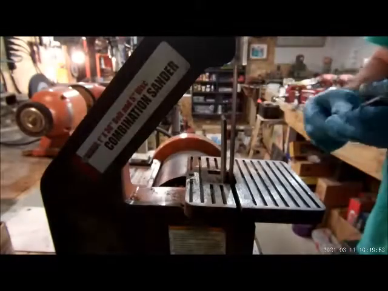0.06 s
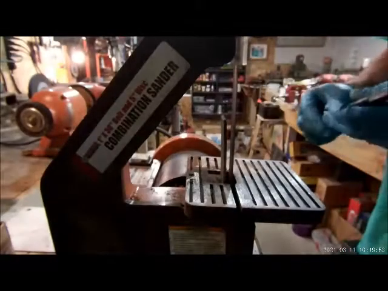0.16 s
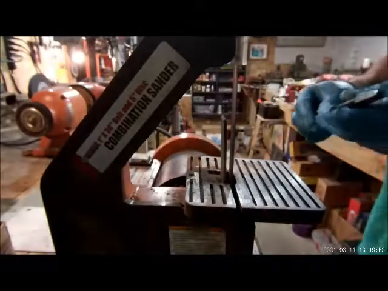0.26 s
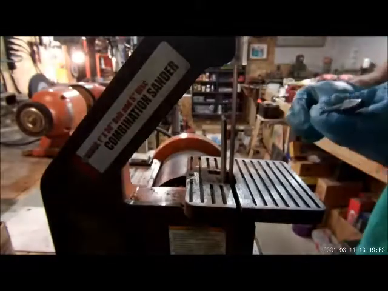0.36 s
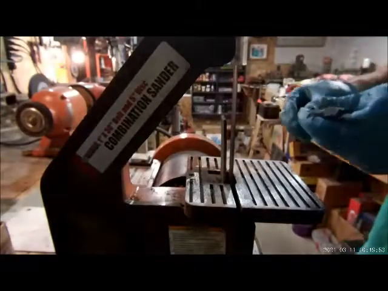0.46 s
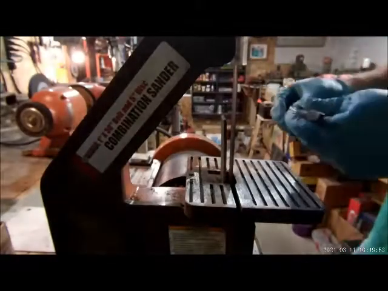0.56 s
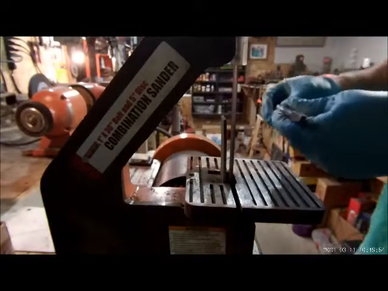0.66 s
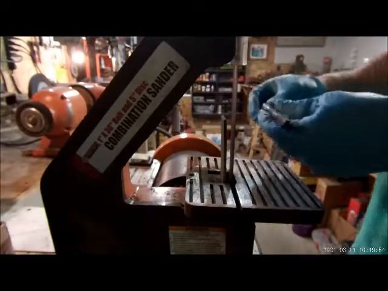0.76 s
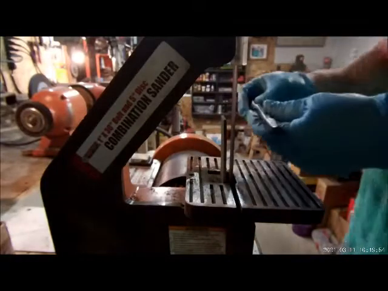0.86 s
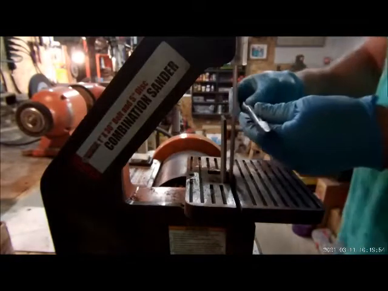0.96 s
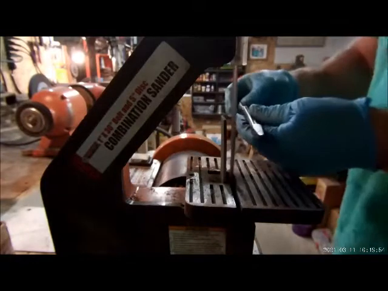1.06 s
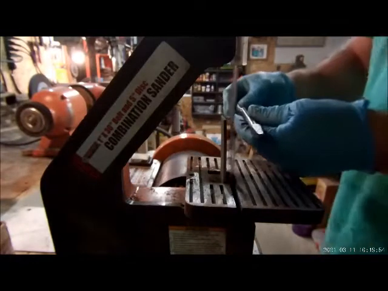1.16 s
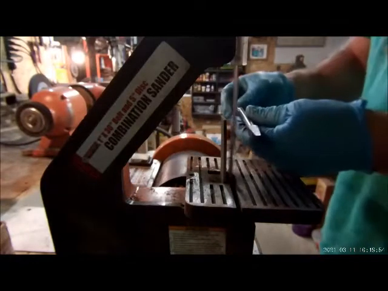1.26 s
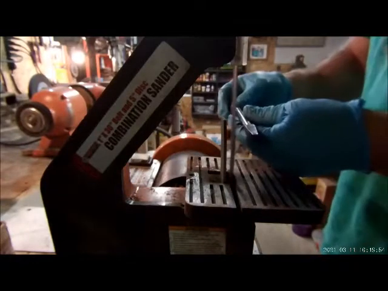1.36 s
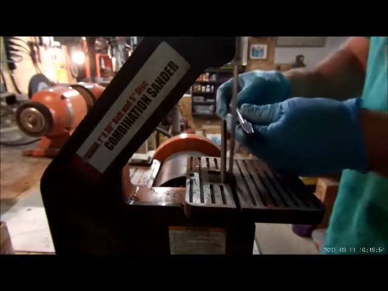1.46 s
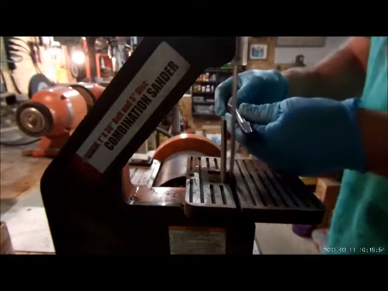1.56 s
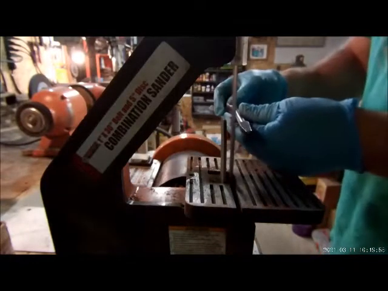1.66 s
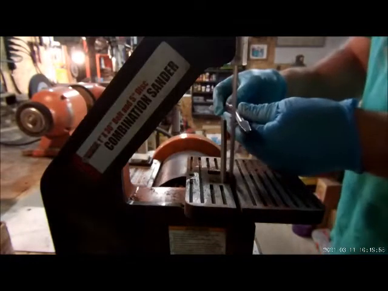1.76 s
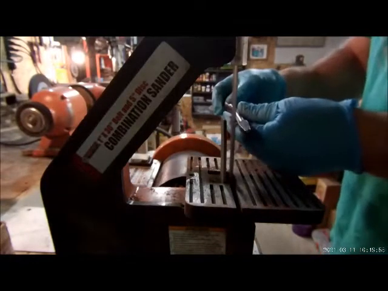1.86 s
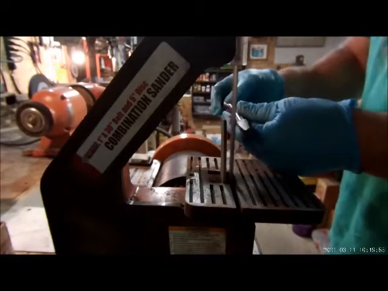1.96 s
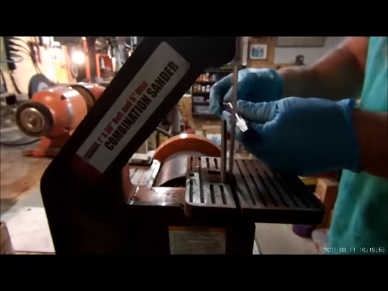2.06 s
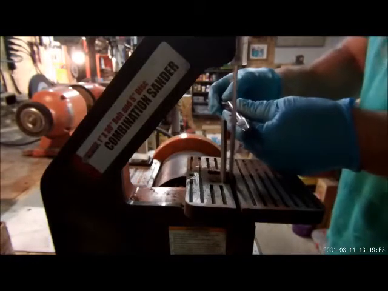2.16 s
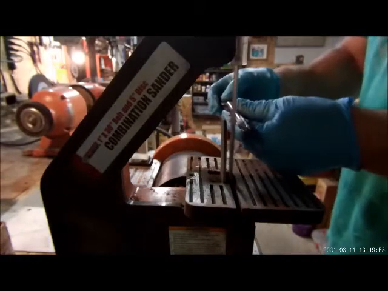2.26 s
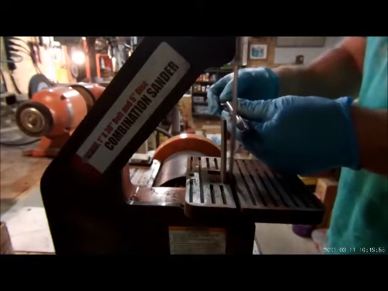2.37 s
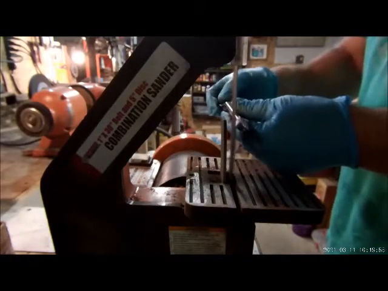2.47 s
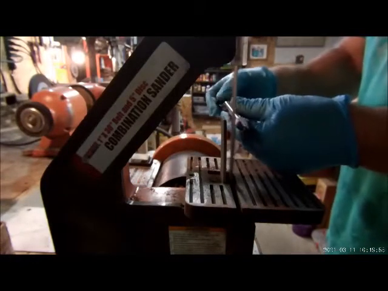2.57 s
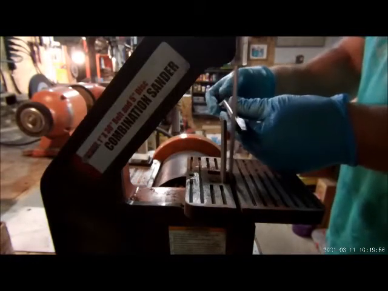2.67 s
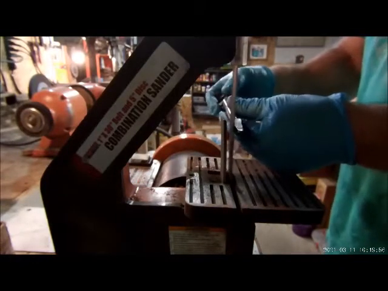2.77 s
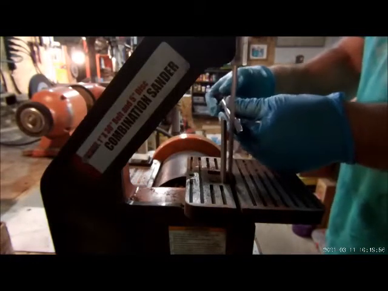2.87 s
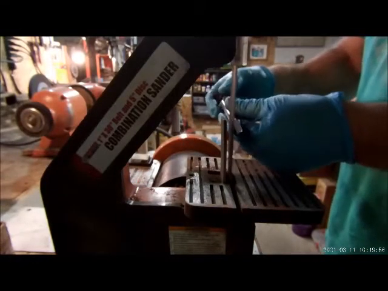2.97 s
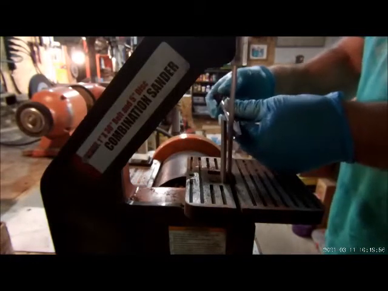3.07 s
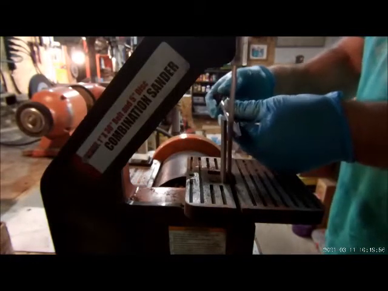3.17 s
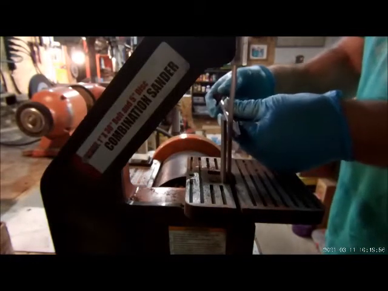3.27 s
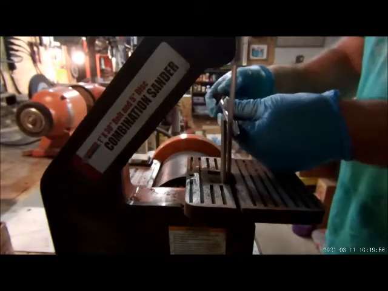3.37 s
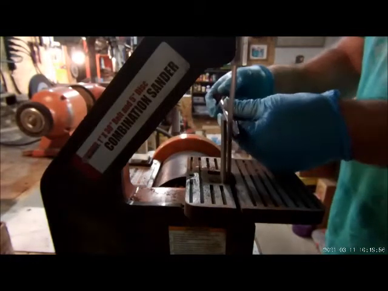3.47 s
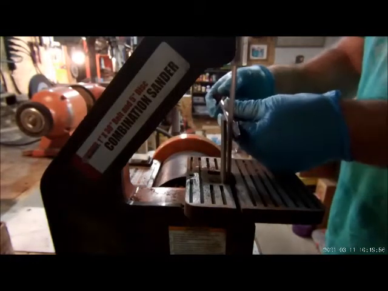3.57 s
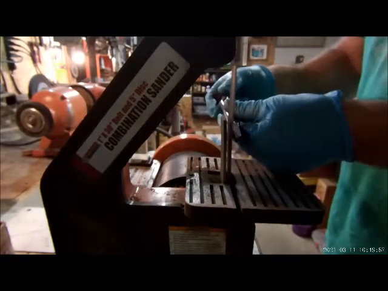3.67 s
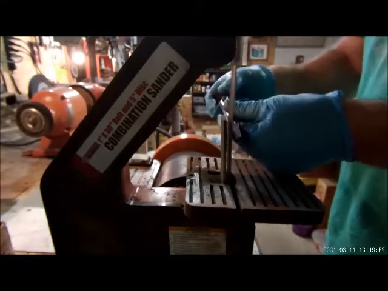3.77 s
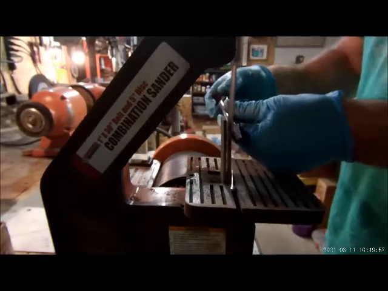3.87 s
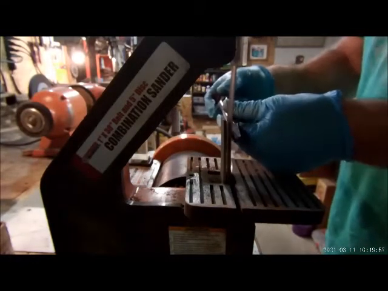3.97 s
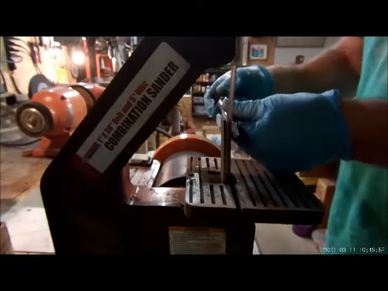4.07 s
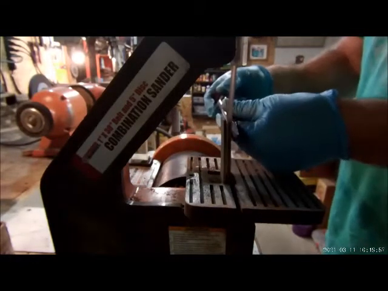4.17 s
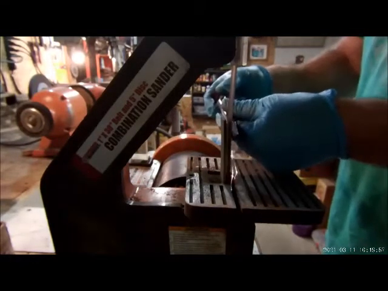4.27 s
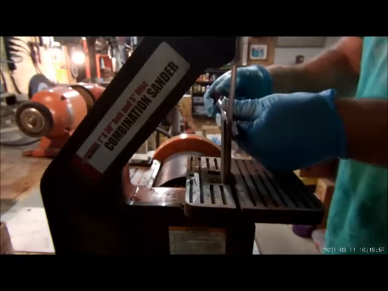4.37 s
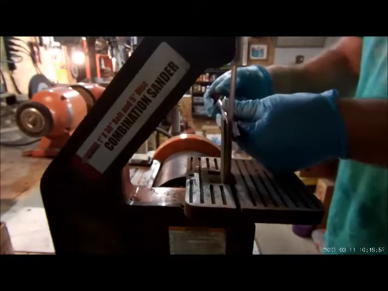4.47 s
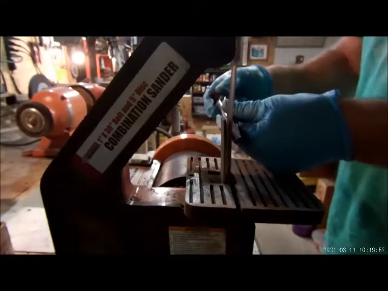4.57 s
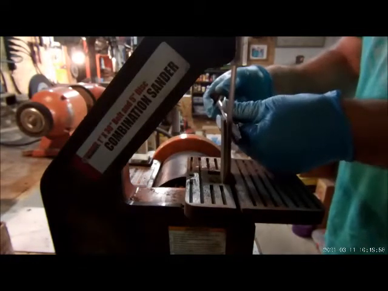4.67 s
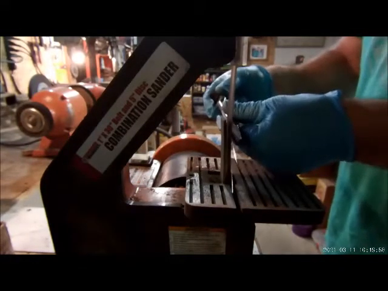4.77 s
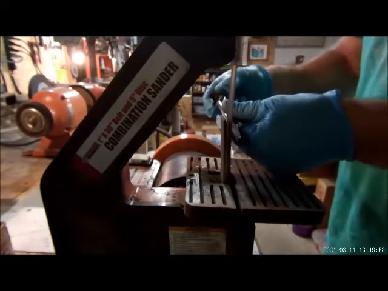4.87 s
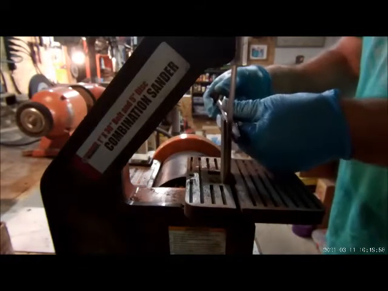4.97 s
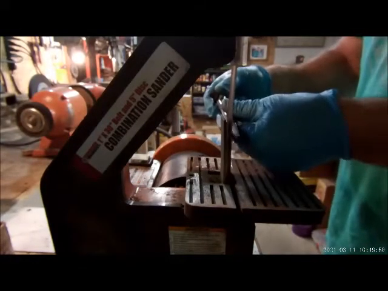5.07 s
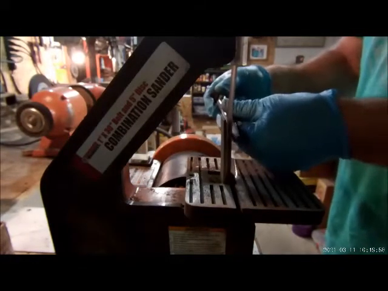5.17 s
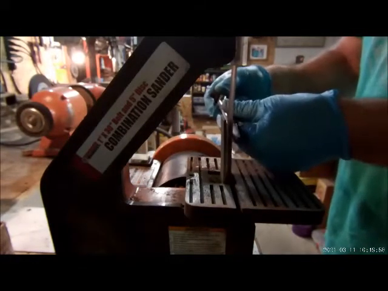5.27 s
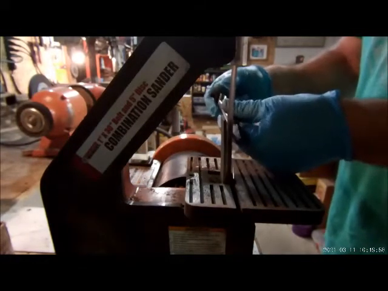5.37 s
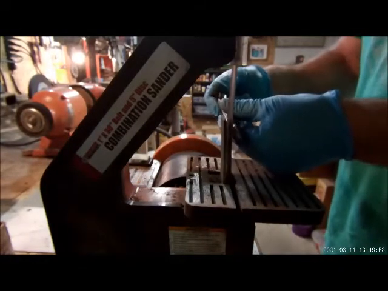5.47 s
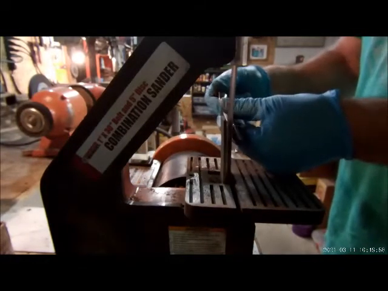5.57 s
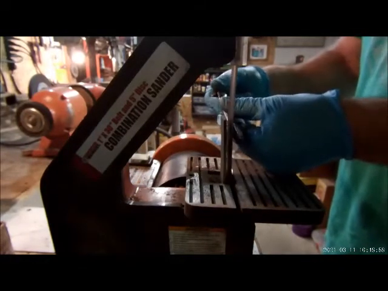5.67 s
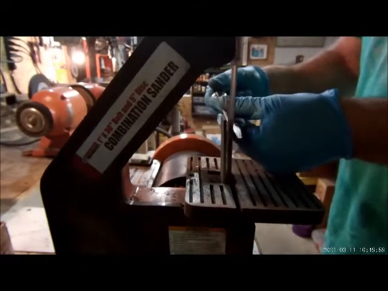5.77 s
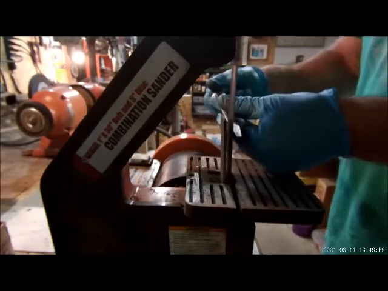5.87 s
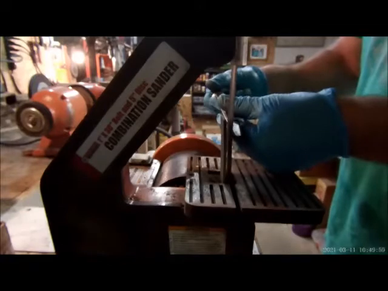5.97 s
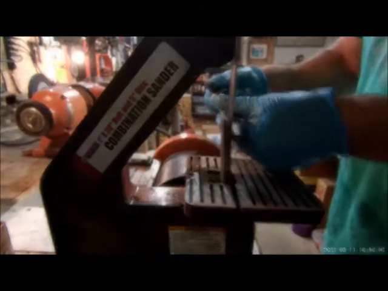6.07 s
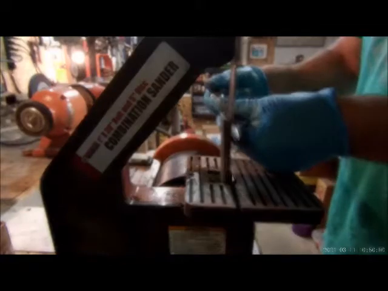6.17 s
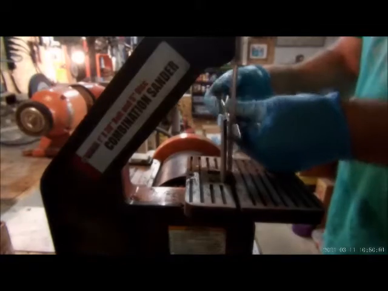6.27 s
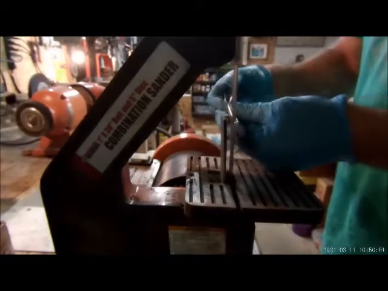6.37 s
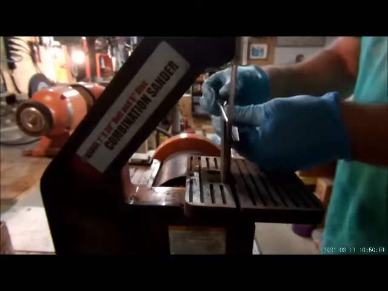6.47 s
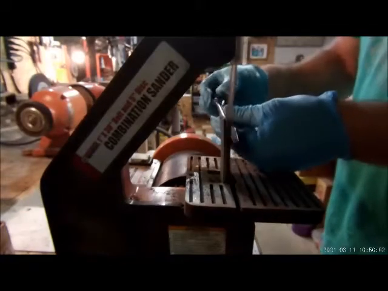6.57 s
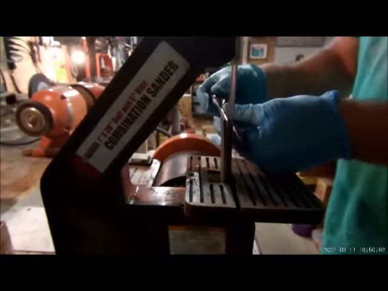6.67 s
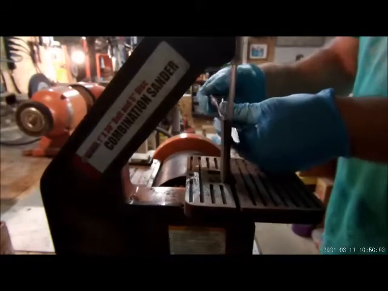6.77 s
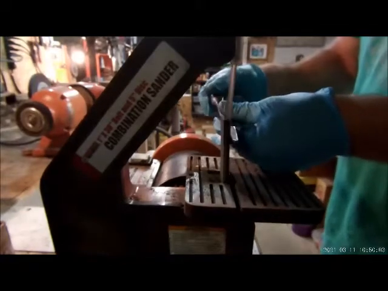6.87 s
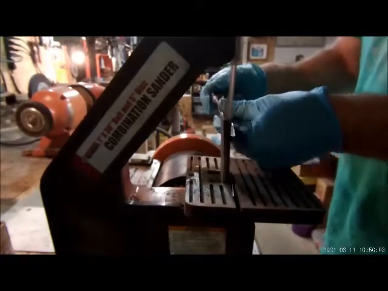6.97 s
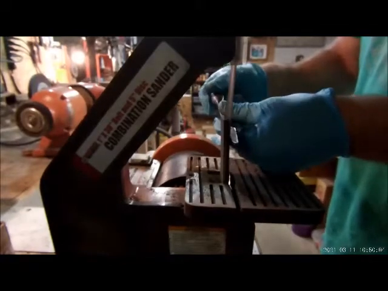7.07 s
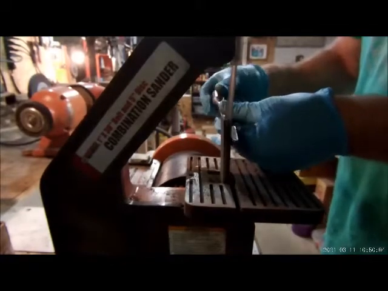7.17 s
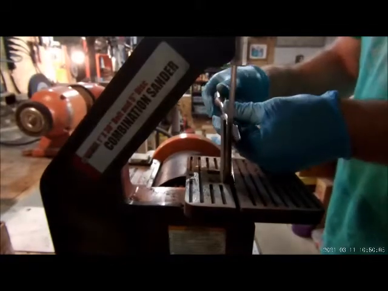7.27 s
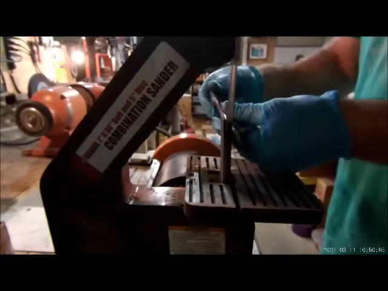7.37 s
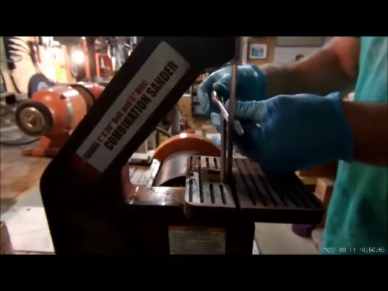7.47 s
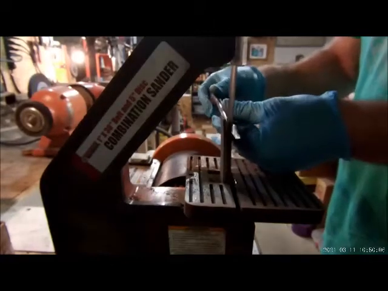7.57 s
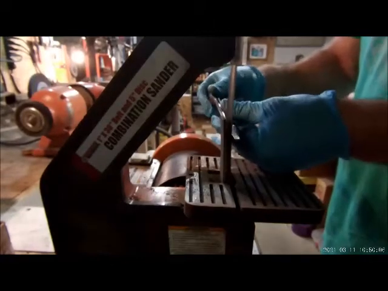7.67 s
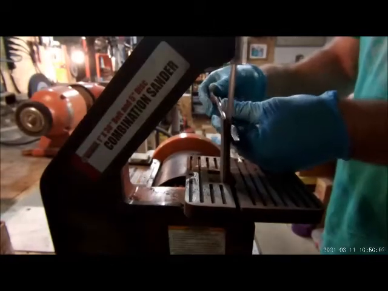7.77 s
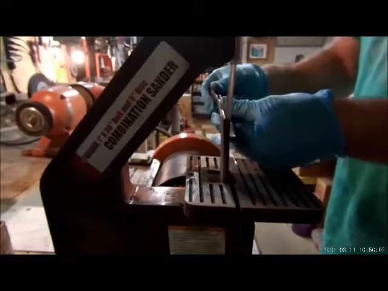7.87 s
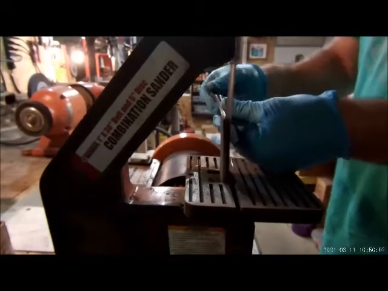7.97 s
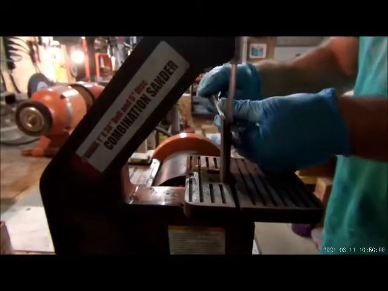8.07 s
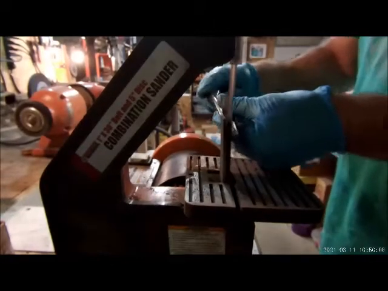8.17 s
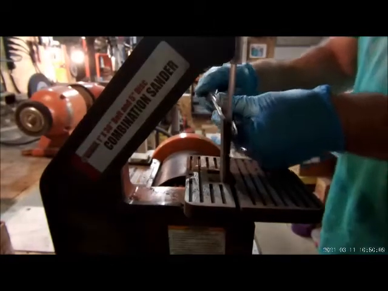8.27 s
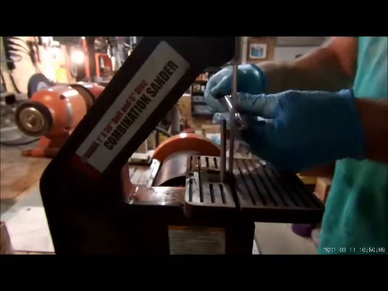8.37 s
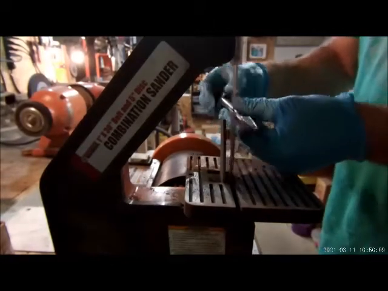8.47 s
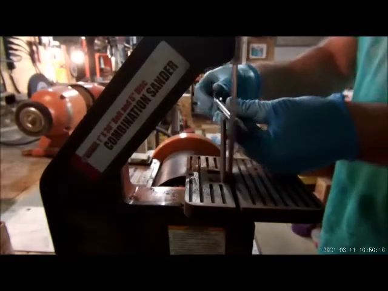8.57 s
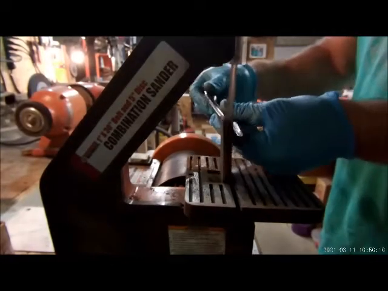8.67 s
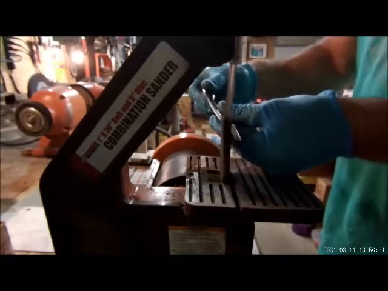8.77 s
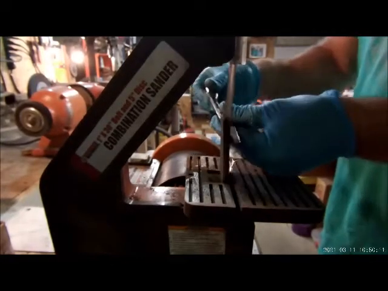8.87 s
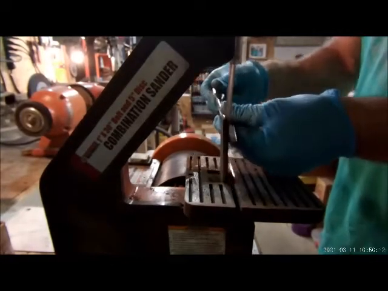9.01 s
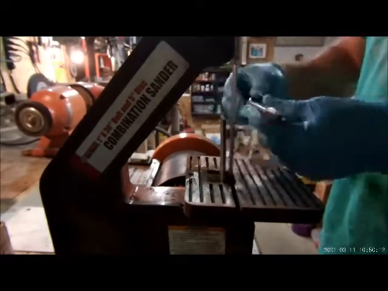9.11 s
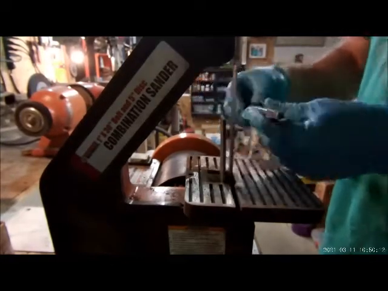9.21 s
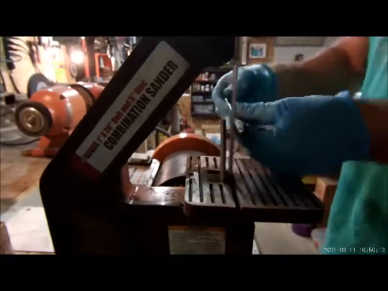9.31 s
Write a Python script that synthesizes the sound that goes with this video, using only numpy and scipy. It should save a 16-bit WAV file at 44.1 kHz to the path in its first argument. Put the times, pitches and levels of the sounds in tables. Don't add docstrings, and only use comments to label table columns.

```python
import sys
import numpy as np
from scipy import signal
from scipy.fft import rfft, irfft, next_fast_len
from scipy.io import wavfile
from scipy.ndimage import uniform_filter1d

SR = 44100
rng = np.random.default_rng(int(sys.argv[2]) if len(sys.argv) > 2 else 0)


def field_ratio(decibels):
    return 10 ** (np.asarray(decibels, dtype=float) / 20)


def wav_out(sig):
    wavfile.write(sys.argv[1], SR, np.round(np.clip(np.atleast_2d(sig).T, -1, 1) * 32767).astype(np.int16))


N = 411894
T = np.arange(N) / SR
FREE_HZ, MAINS_HZ = 59.04, 60


def noise():
    return rng.standard_normal(N)


def evened(x):
    return x / np.sqrt(np.mean(x ** 2) + 1e-20)


def drift(hz):
    knots = np.arange(0, N / SR + 1, .5 / hz)
    return evened(np.interp(T, knots, rng.standard_normal(len(knots))))


def impulses(events):
    out = np.zeros(N)
    for s, db in events:
        out[round(s * SR)] = field_ratio(db)
    return out


def colour(x, points, faster=1):
    hz, db = np.transpose(points)
    size, length = 16384, 4096
    bins_hz = abs(np.fft.fftfreq(size, 1 / SR))
    gain_db = np.interp(np.log(bins_hz + 1), np.log(hz * faster), np.maximum(db, -90))
    log_gain = gain_db * np.log(10) / 20
    phase = -signal.hilbert(log_gain).imag
    fade = np.hanning(2 * length)[length:]
    taps = np.fft.ifft(np.exp(log_gain + 1j * phase)).real[:length] * fade
    return signal.oaconvolve(x, taps / np.linalg.norm(taps))[:N]


def resonate(x, hz, width):
    r = np.exp(-np.pi * width / SR)
    pole = r * np.exp(2j * np.pi * min(hz, .49 * SR) / SR)
    return 2 * signal.lfilter([1 - r], [1, -pole], x).real


def low_cut(x, hz):
    return signal.sosfilt(signal.butter(3, hz, "high", fs=SR, output="sos"), x)


# (frequency [Hz], level [dB])
FRAME_TREBLE = [(2300, -26), (3500, -29.5), (4200, -44), (8000, -38), (16000, -79)]


def frame(blows, orders, faster=1):
    return colour(blows, [(59 * k, db) for k, db in orders] + FRAME_TREBLE, faster)


def plate_start(blows):
    plate_hz, width_hz = 1667, 8.3
    strikes = field_ratio(-18) * blows + impulses([(0, -45)])
    ring = resonate(strikes, plate_hz, width_hz) / (2 - 2 * np.exp(-np.pi * width_hz / SR))
    since = T - START_KNOCKS[0][0]
    whine = np.sqrt(2) * np.sin(2 * np.pi * plate_hz * T + 0.5 * drift(25.4))
    whine_db = -40 - 24 * since + 1.2 * drift(20)
    return ring + field_ratio(whine_db) * (since > 0) * whine


def gathering():
    creep_hz = 0.42
    s = np.transpose(START_KNOCKS)[0]
    midways = (s[1:] + s[:-1]) / 2
    hz = np.interp(T, np.r_[0, midways], np.r_[creep_hz, 1 / np.diff(s)])
    return np.clip(np.where(T > s[-1], FREE_HZ, hz) / FREE_HZ, 1e-3, 1)


# (time [s], peak level [dB])
START_KNOCKS = [(0.08, -19), (0.354, -10), (0.487, -6), (0.582, -6.5), (0.657, -6.5), (0.72, -5),
                (0.775, -6.5), (0.823, -6), (0.866, -7), (0.905, -11), (0.941, -8.5), (0.971, -22),
                (0.999, -6.5), (1.027, -12.5), (1.05, -7.5), (1.073, -9), (1.095, -8), (1.115, -7.5),
                (1.135, -8.5)]
# (frequency [Hz], density [dB per Hz])
KNOCK_SPECTRUM = [(120, -50), (200, -40), (596, -5.5), (798, -7.5), (974, 1), (1300, -19), (1680, -7),
                  (2960, -22.5), (3680, -26.5), (4500, -36), (4920, -66), (5490, -35.5), (8200, -33.5),
                  (9480, -31.5), (15500, -61)]
# (frequency [Hz], density [dB per Hz])
RATTLE_SPECTRUM = [(35, -117), (60, -62), (306, -32.5), (411, -23), (459, -13.5), (653, -7), (716, -12.5),
                   (894, -6.5), (1020, -15), (1100, -4), (1200, -21.5), (1270, -12.5), (1680, -7.5),
                   (2300, -14), (5000, -37.5), (6500, -41), (11000, -120)]
# (frequency [Hz], density [dB per Hz])
BELT_SPECTRUM = [(2350, -23), (4000, -1), (4510, -3.5), (4780, -3), (5260, -6), (6660, 4), (7990, 5),
                 (8560, 0.5), (9170, 7), (10700, -0.5), (13100, 0), (14100, -11), (14900, 2), (15700, -8)]
# (multiple of 59 Hz [1], level [dB])
FRAME_LOADED = [(1, -61), (2, -56), (3, -42), (4, -42.5), (5, -29.5), (6, -32), (7, -11), (8, -27.5),
                (9, -10.5), (10, -18), (11, -10), (12, -16), (13, -9), (14, -14.5), (15, 4.5), (16, 2),
                (17, -1.5), (18, 0.5), (19, -14), (20, -0.5), (21, -5.5), (22, -7), (23, -11.5), (24, -1.5),
                (25, -14.5), (26, -4), (27, 0.5), (28, -1.5), (29, -50), (30, -21.5), (31, -11.5),
                (32, -14), (33, -6), (34, -4), (35, -15), (36, -9.5)]


def spin_up():
    speed = gathering()
    decades = np.log10(speed)
    blows = impulses(START_KNOCKS)
    t = np.arange(700) / SR
    chatter = 0.65 * rng.standard_normal(len(t)) * np.exp(-t / 0.011)
    chatter *= rng.random(len(t)) < .03
    chatter[[0, 130, 370]] = .8, -.6, .9
    bounced = signal.oaconvolve(blows, chatter)[:N]
    knocks = field_ratio(1.5) * colour(bounced, KNOCK_SPECTRUM)
    knocks += field_ratio(10) * frame(bounced, FRAME_LOADED)
    decay = np.exp(-np.arange(4000) / SR / 0.027)
    tail = signal.oaconvolve(blows, decay)[:N] * noise()
    knocks += field_ratio(-15) * colour(tail, KNOCK_SPECTRUM)
    knocks += field_ratio(-16) * colour(blows, BELT_SPECTRUM)

    rattle_db = -23 + 18.5 * decades
    rattle = field_ratio(rattle_db) * evened(colour(noise(), RATTLE_SPECTRUM))
    handed_over = np.clip((1.16 - T) / 0.061, 0, 1)
    belt_db = -36 + 21 * decades - 6 * pressure() + drift(40)
    belt = field_ratio(belt_db) * evened(colour(noise(), BELT_SPECTRUM))
    belt *= np.clip(speed / .13, 0, 1) ** 2
    return knocks + handed_over * (rattle + plate_start(blows)) + belt


def spread(blows, faster):
    size = next_fast_len(N)
    hz = np.fft.rfftfreq(size, 1 / SR) / faster
    lag = 3.6 * np.sin(2 * np.pi * (hz - 950) / 1300)
    lag += .45 * np.sin(2 * np.pi * (hz - 945) / 330)
    return irfft(rfft(blows, size) * np.exp(-1j * lag), size)[:N]


# (multiple of 59 Hz [1], level [dB])
FRAME_FREE = [(1, -63), (2, -46.5), (3, -41), (4, -41.5), (5, -37.5), (6, -27), (7, -10), (8, -18.5),
              (9, -22.5), (10, -20.5), (11, -4.5), (12, -32.5), (13, -8), (14, -13.5), (15, 4.5), (16, -5),
              (17, 4), (18, -11), (19, -36), (20, -5.5), (21, -11), (22, -40), (23, -9), (24, -13.5),
              (25, -18.5), (26, -4), (27, -12), (28, 6.5), (29, -18), (30, -23), (31, 1), (32, -30),
              (33, -17), (34, -5.5), (35, -19.5), (36, -12)]


def machine(wheel_hz, load, faster, plate_db, throb_db, rattle_db):
    turns = np.cumsum(wheel_hz) / SR
    mains_hz = MAINS_HZ * faster
    slip = 4 * np.pi * (mains_hz * T - turns)
    alternation_db = field_ratio(rattle_db) * .8 * drift(3 * faster) * np.cos(np.pi * turns)
    strength = field_ratio(.5 * noise() + alternation_db)
    landed = np.diff(np.floor(turns), prepend=0) * strength
    landed *= field_ratio(throb_db * np.cos(slip + 2.8))
    late = np.clip(turns % 1 / (wheel_hz / SR + 1e-9), 0, 1)
    blows = spread(landed * (1 - late) + np.roll(landed * late, -1), faster)
    load = np.clip(load + 0.38 * np.cos(slip + 0.22), 0, 1)
    knocks = (1 - load) * evened(frame(blows, FRAME_FREE, faster))
    knocks += load * evened(frame(blows, FRAME_LOADED, faster))

    shaken = (5.7 + np.exp(-(turns % 1) / 5.3)) * field_ratio(0.52 * drift(12 * faster)) * noise()
    rattle = field_ratio(-7) * evened(colour(shaken, RATTLE_SPECTRUM, faster))
    rattle += field_ratio(-14) * evened(frame(shaken, FRAME_LOADED, faster))
    plate = evened(resonate(shaken, 1673 * faster, 14 * faster))
    plate *= 1 - load
    hum = np.cos(4 * np.pi * mains_hz * T) + 1.3 * np.cos(6 * np.pi * mains_hz * T)
    hum *= field_ratio(-55.5 + 2.7 * drift(4 * faster))
    return evened(knocks) + field_ratio(rattle_db) * rattle + field_ratio(plate_db) * plate + hum


# (frequency [Hz], width [Hz], level [dB])
GUARD_MODES = [(3420, 60, -48), (4400, 60, -52)]


def guard(wheel_hz):
    uneven_db = 1.5 * noise() + 2.5 * drift(3)
    pings = np.diff(np.floor(np.cumsum(wheel_hz) / SR / 2), prepend=0) * field_ratio(uneven_db)
    return sum(field_ratio(db) * evened(resonate(pings, hz, width)) for hz, width, db in GUARD_MODES)


def running():
    settle_s, sag_hz = .045, .55
    press = pressure()
    last_s = START_KNOCKS[-1][0]
    since = T - last_s
    short_hz = FREE_HZ - 1 / (last_s - START_KNOCKS[-2][0])
    wheel_hz = FREE_HZ - short_hz * np.exp(-abs(since) / settle_s) - sag_hz * press
    wheel_hz = wheel_hz * (1 + .001 * drift(4)) * (since > 0)
    load = 0.24 + (0.76 - 0.24) * press
    rattle_db = 1.96 - 0.68 * press
    sound = machine(wheel_hz, load, faster=0.99, plate_db=-10, throb_db=-0.24, rattle_db=rattle_db)
    level_db = -18 - 3 * press + 0.25 * drift(6.5)
    fade_in = np.clip((T - 1.13) / 0.02, 0, 1)
    return field_ratio(level_db) * fade_in * sound + field_ratio(-8 * press) * guard(wheel_hz)


def looped(x, keep):
    loop_hz, creep = 23.37, .004
    size = round(SR / loop_hz)
    loops = np.resize(x, (N // size + 1, size))
    worn = signal.lfilter([1], [1, -np.clip(keep, 0, .95)], loops, axis=0).ravel()
    place = np.cumsum(1 + creep * drift(2.5))
    return evened(worn[np.round(place).astype(int) % N])


def pressure():
    s, db = np.transpose(GRINDING)
    return field_ratio(np.interp(T, s, db) + 15) * (T > s[0])


# (time [s], grinding level [dB])
GRINDING = [(2.84, -29), (2.9, -22.5), (3.09, -18), (3.44, -16), (3.69, -17.5), (3.86, -15), (4.58, -16.5),
            (4.72, -14), (4.93, -16.5), (5.05, -15), (5.38, -16), (5.55, -14), (5.94, -20.5), (6.51, -18.5)]
# (time [s], peak level [dB])
FIRST_SKIPS = [(2.7681, -37), (2.7851, -11), (2.802, -15), (2.817, -4), (2.8334, -7), (2.8444, -6),
               (2.8594, -5), (2.8686, -8), (2.8804, -11), (2.8924, -9), (2.9034, -6)]
# (frequency [Hz], width [Hz], level [dB])
SHANK_MODES = [(4530, 49, -10), (5214, 164, -6), (5770, 94, 1), (6150, 63, -2), (7050, 540, 5),
               (8050, 180, -7), (9280, 170, 9.5), (10100, 240, -3), (10070, 120, -4.5), (10970, 350, 5),
               (12240, 400, -11), (12800, 460, 0), (13650, 460, -3.5), (14860, 820, 2)]
# (frequency [Hz], density [dB per Hz])
GRIT_SPECTRUM = [(2000, -56), (3200, -13.5), (4200, -21), (6500, -8.5), (8500, 0), (12000, -3.5),
                 (14200, -10), (16000, -28.5)]


def grinding():
    skip_hz = 114.3
    s, db = np.transpose(GRINDING)
    level_db = np.interp(T, s, db)
    bumps_db = 0.54 * looped(drift(150), 0.25) + 0.24 * drift(10)
    skips_db = 1.33 * np.cos(2 * np.pi * skip_hz * T + 1.5 * drift(3.5))
    grains = field_ratio(2 * np.minimum(rng.exponential(1, N), 4)) * noise()
    scrape = evened(looped(grains, 0.86) * field_ratio(bumps_db + skips_db))
    scrape *= field_ratio(level_db) * (T > s[0])
    skip_decay = np.exp(-np.arange(400) / 70)
    scrape += field_ratio(-9) * signal.oaconvolve(impulses(FIRST_SKIPS), skip_decay)[:N] * noise()
    hz = np.arange(500, 20000, 20.)
    modes = sum(field_ratio(2 * db) / (1 + (2 * (hz - f) / width) ** 2) ** 1.39 for f, width, db in SHANK_MODES)
    grit_hz, grit_db = np.transpose(GRIT_SPECTRUM)
    grit = field_ratio(2 * np.interp(np.log(hz), np.log(grit_hz), grit_db))
    spectrum = np.transpose([hz, 10 * np.log10(modes + grit)])
    return low_cut(colour(scrape, spectrum), 1300)


# (frequency [Hz], width [Hz])
ECHO_GAPS = [(4240, 110), (4910, 67), (5450, 120), (5970, 70), (6350, 130), (7500, 50), (7800, 49),
             (8950, 40), (10130, 36), (11350, 68)]


def cancelled(x):
    depth = .65 * np.clip(2 * pressure(), 0, 1)
    for hz, width in ECHO_GAPS:
        x = x - depth * resonate(x, hz, width)
    return x


# (time [s], pressure 0-1.3 [1])
HAND_GRIPS = [
    (6.02, .7),
    (6.3, .2),
    (6.56, .8),
    (7.1, .6),
    (7.82, .9),
    (8.15, .65),
    (8.42, .15),
    (8.77, 1.2),
    (9.13, .15),
]


def grip():
    s, press = np.transpose(HAND_GRIPS)
    steps = press[np.maximum(np.searchsorted(s, T) - 1, 0)]
    return uniform_filter1d(steps, size=round(.06 * SR))


# (time [s], drop [dB], length [s])
LEVEL_DIPS = [(6.08, 0.5, 0.064), (6.282, 4, 0.024), (6.615, 3.5, .04), (6.704, 3, 0.027),
              (6.807, 3, 0.028), (7.433, 3, 0.064), (7.493, 2, .02), (7.61, 3, .03), (8.056, 4.5, 0.029),
              (8.125, 4, .02), (8.393, 4, 0.007), (8.85, 1.5, 0.012), (8.985, 1.5, 0.012)]
# (frequency [Hz], density [dB per Hz])
FAST_HISS_SPECTRUM = [(4410, -23.5), (7500, 13), (8140, 7.5), (9330, 2), (11100, -28), (14300, 4),
                      (15500, -11)]


def fast_stretch():
    press = grip()
    wheel_hz = (236.6 - 3.8 * press) * (1 + .0025 * drift(25))
    load = 0.54 + (1 - 0.54) * press
    level_db = -18 - 1.5 * press
    for s, drop_db, length in LEVEL_DIPS:
        level_db = level_db - drop_db * np.exp(-((T - s) / length) ** 2)
    rattle_db = 1.5 - 2 * press
    sound = machine(wheel_hz, load, faster=4, plate_db=-9, throb_db=2.5, rattle_db=rattle_db)
    hiss_db = level_db - 13.5 + 0.94 * drift(60) + 1.2 * drift(15)
    hiss = field_ratio(hiss_db) * colour(noise(), FAST_HISS_SPECTRUM)
    return field_ratio(level_db + 0.23 * drift(14)) * sound + hiss


def bump():
    return signal.oaconvolve(impulses([(7.142, -64)]), np.hanning(60))[:N]


def scene():
    fast_from, slow_until, cut_s = 6.021, 6.523, .001
    slow = low_cut(cancelled(spin_up() + running() + grinding()), 86)
    slow *= np.clip((slow_until - T) / cut_s, 0, 1)
    fast = low_cut(fast_stretch(), 420)
    fast *= np.clip((T - fast_from) / cut_s, 0, 1)
    hiss = field_ratio(-82) * noise()
    return (slow + fast + bump() + hiss)[None]


def band_limit(x):
    return signal.sosfilt(signal.butter(12, 16460, fs=SR, output="sos"), x)


def record(dry):
    ceiling, edge_hz = .93, 15770
    limited = dry / (1 + (dry / ceiling) ** 6) ** (1 / 6)
    edge = signal.firwin(2047, edge_hz, window=("kaiser", 9), fs=SR)
    mix = signal.oaconvolve(limited, edge[None], "same")
    return band_limit(mix)


dry = scene()
out = record(dry)
wav_out(out)
```